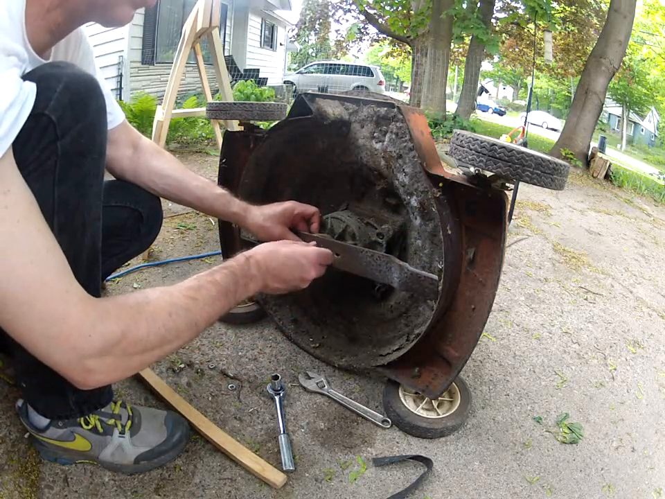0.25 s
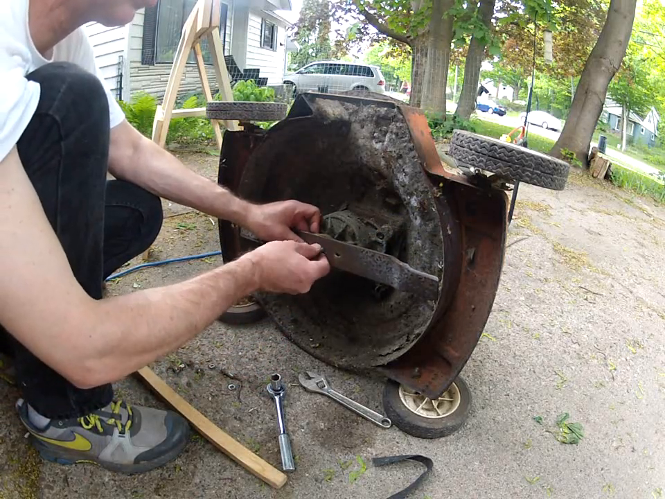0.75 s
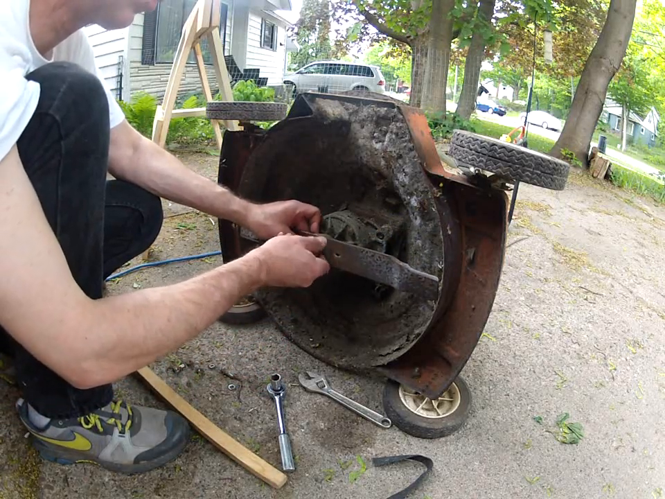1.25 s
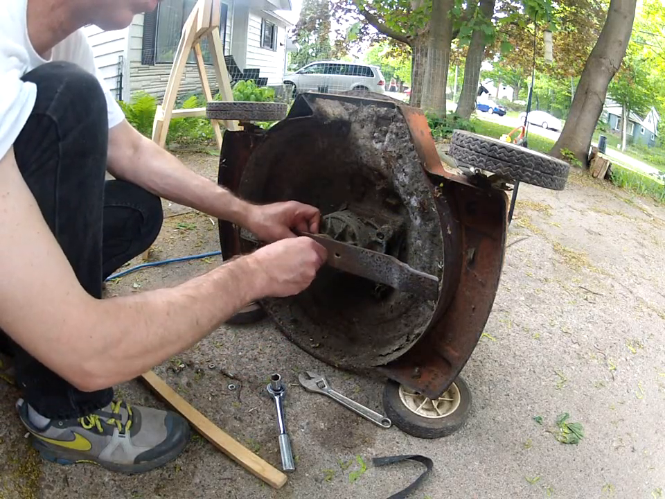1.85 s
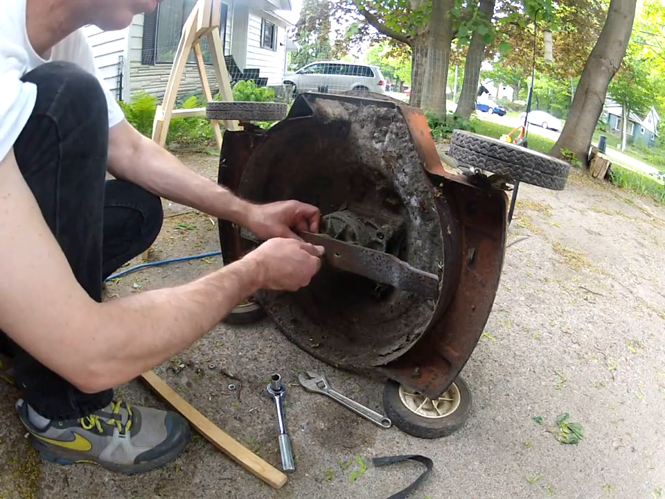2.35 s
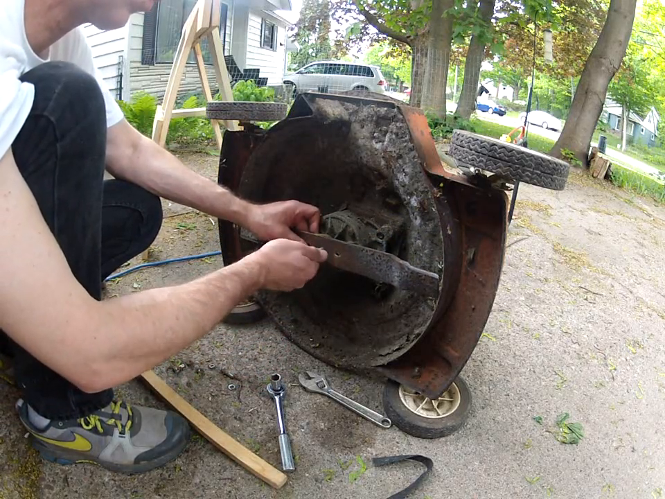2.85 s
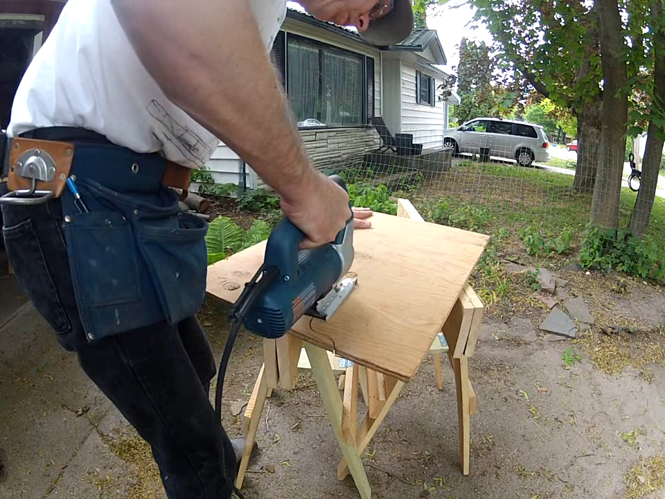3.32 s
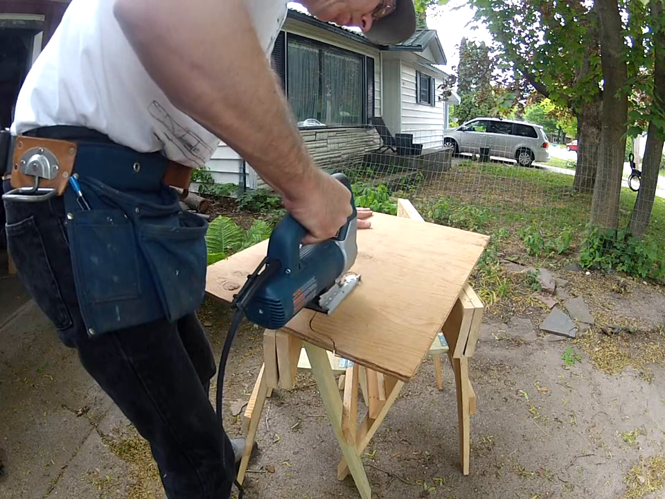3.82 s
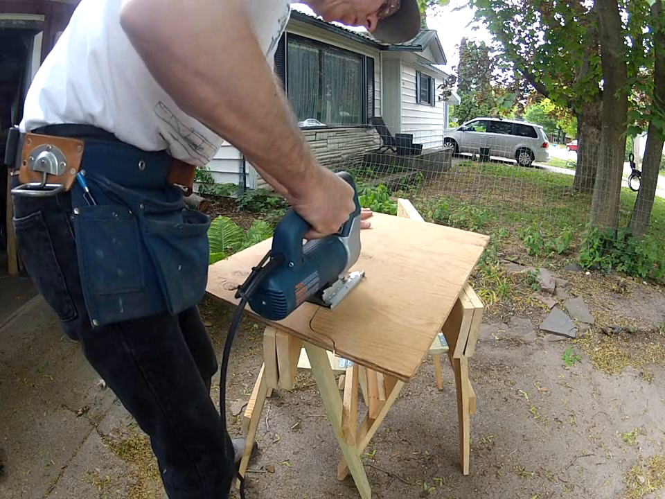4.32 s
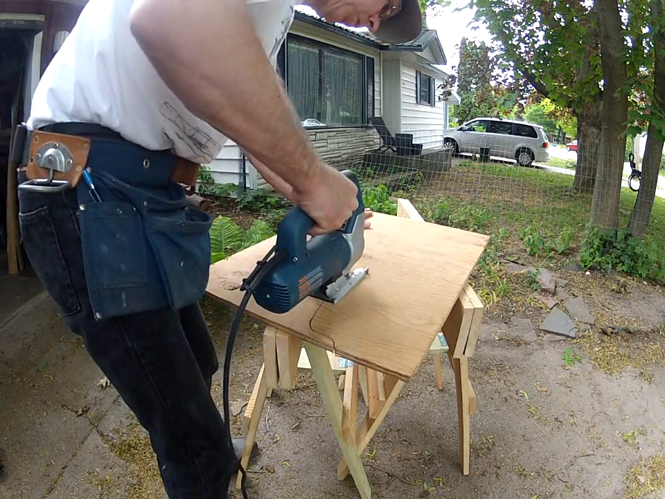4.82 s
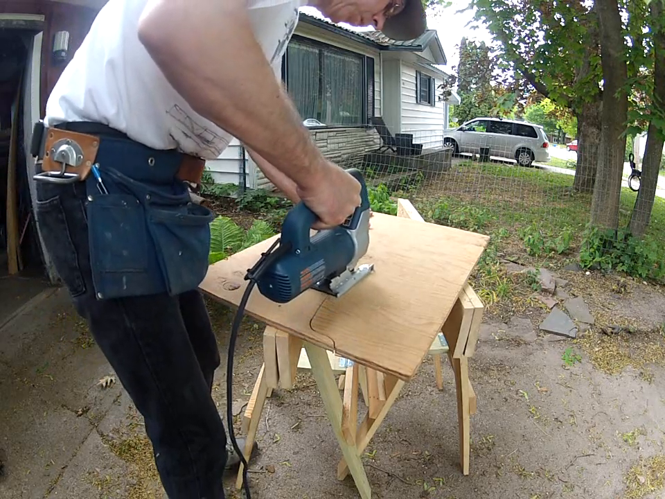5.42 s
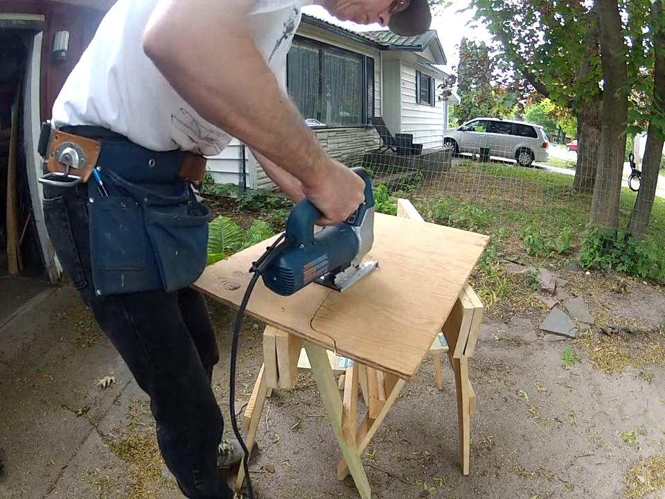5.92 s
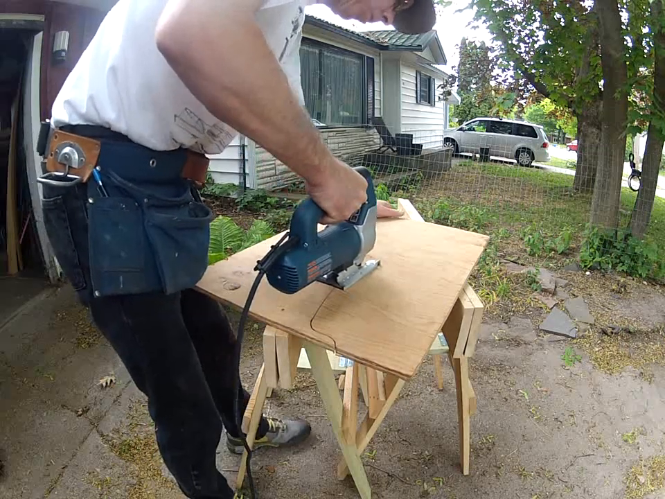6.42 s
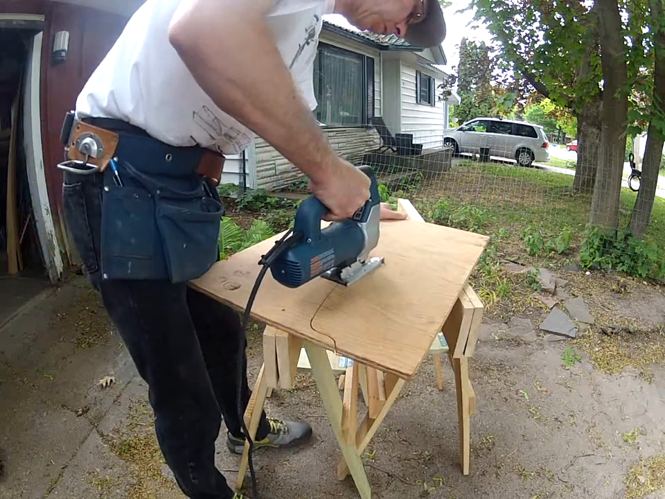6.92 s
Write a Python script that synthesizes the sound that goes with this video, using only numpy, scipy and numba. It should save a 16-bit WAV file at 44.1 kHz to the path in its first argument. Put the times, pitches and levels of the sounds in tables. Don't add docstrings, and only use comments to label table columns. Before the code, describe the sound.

Outdoors in a residential yard, a car pulls away, its engine pitch falling quickly and tyre drone fading to a faint hush while small birds whistle. After a tiny gap, a jigsaw bursts in close at full speed, a loud low buzz with rasping teeth. The plywood loosens, rings higher and slaps its support in rapid clatter, then the motor briefly races. Gritty, low-quality camera microphone with crunchy peaks and wind puffs.

```python
import sys
import numpy as np
from scipy import signal
from scipy.fft import rfft, irfft, next_fast_len
from scipy.io import wavfile
from scipy.ndimage import uniform_filter1d
from numba import njit

SR = 44100
rng = np.random.default_rng(int(sys.argv[2]) if len(sys.argv) > 2 else 0)


def natural_amplitude(level_db):
    exponent = np.asarray(level_db, float) / 20
    return 10 ** exponent


def generate_wav(signal):
    frames = np.transpose(np.atleast_2d(signal))
    scaled = np.clip(frames, -1, 1) * 32767
    pcm = np.round(scaled).astype(np.int16)
    wavfile.write(sys.argv[1], SR, pcm)


N = 315756
T = np.arange(N) / SR
STREET_ENDS_S, SAW_STARTS_S = 3.1305, 3.1498


def curves(table):
    s, *columns = np.transpose(table)
    return [np.interp(T, s, c) for c in columns]


def stages(table, glide_s):
    s, *columns = np.transpose(table)
    row = np.clip(np.searchsorted(s, T) - 1, 0, None)
    return [uniform_filter1d(c[row], int(glide_s * SR)) for c in columns]


def steady(x, window_s=0.064):
    window = int(window_s * SR)
    power = uniform_filter1d(uniform_filter1d(x ** 2, window), window)
    return x / np.sqrt(power + 1e-12)


def colour(x, spectrum):
    hz, db = np.transpose(spectrum)
    size = next_fast_len(N)
    f = np.arange(size // 2 + 1) * SR / size + 1
    gain = natural_amplitude(np.interp(np.log(f), np.log(hz), db))
    return steady(irfft(rfft(x, size) * gain, size)[:N], 0.33)


def walk(rate):
    k = int(SR / rate)
    steps = np.repeat(rng.standard_normal(N // k + 1), k)
    return 1.17 * uniform_filter1d(uniform_filter1d(steps, k), k)[:N]


@njit
def svf(x, hz, width):
    y, b, l = np.empty(len(x)), 0., 0.
    for i in range(len(x)):
        g, k = np.tan(np.pi * hz[i] / SR), width[i] / hz[i]
        v = (b + g * (x[i] - l)) / (1 + g * (g + k))
        b, l, y[i] = 2 * v - b, l + 2 * g * v, k * v
    return y


def ring(x, modes, scale_hz=0.93, sign=-1):
    ones = np.ones(N)
    return sum(sign ** k * natural_amplitude(db) * svf(x, f * scale_hz * ones, w * ones)
               for k, (f, w, db) in enumerate(modes))


# start in seconds, push into the sheet in dB, feed into the wood in dB,
# roughness from 0 to 1, level of every second stroke in dB.
CUT_STAGES = [(3.15, -15.5, -16, 0.24, -1.5), (3.5, -15, -18, 0.31, 0.5), (4.25, -14.5, -18, 0.42, -1),
              (4.76, -26, -15.5, 0.31, 0), (5.0, -18.5, -16, 0.37, -1), (5.21, -22, -16, 0.33, -4),
              (5.34, -13.5, -16, 0.48, -1), (5.53, -13, -21.5, 0.54, -18), (6.12, -24, -21.5, 0.62, 1.5),
              (6.27, -22.5, -18.5, 0.48, 1.5), (6.42, -25.5, -18.5, 0.16, 1), (6.7, -28.5, -16, 0.24, 2),
              (6.85, -16.5, -17, 0.42, -9), (6.97, -17, -18.5, 0.42, 0)]
FREED_S, FREEING_S = 4.76, 0.046
LOADED_HZ = 40.6


def jigsaw():
    rate, count = crank()
    push_db, feed_db, rough, weak_db = stages(CUT_STAGES, 0.06)
    rough = np.clip(rough, 0, 1)
    eased_db = push_db - CUT_STAGES[0][1]
    freed = np.clip((T - FREED_S) / FREEING_S + .5, 0, 1)
    knock = knocks(count, rough, weak_db)
    teeth = toothmarks(count)
    noise = rng.standard_normal((4, N))
    gate = 1 + 0.084 * np.cos(2 * np.pi * (count % 1 - 0.05))
    bite = knock + 4.7 * teeth + 3.0 * rough * gate * noise[3]

    sheet = natural_amplitude(push_db) * sheet_boom(knock + 4.0 * rough * noise[1], eased_db, freed)
    sheet = sheet - sheet_middle(knock + 3.05 * teeth + 5.0 * rough * gate * noise[2], eased_db, freed)
    sheet = sheet + sheet_upper(bite, rate, eased_db, freed)
    cutting = rasp(knock, teeth, rough, gate, noise[0]) + blade_ring(bite) + sheet_buzz(teeth, freed)
    machine = gear_whine(noise[0], rate, freed) + gear_mesh(rate, count) + squeal(noise[1])
    return sheet - housing_shake(count, eased_db) + natural_amplitude(feed_db) * cutting + machine


# time in seconds, blade speed in strokes per second.
STROKE_RATE = [(3.15, 39.8), (3.39, 40.1), (3.6, 40.6), (4.08, 40.6), (4.37, 40.4), (4.65, 40.7),
               (4.91, 40.9), (5.25, 41.0), (5.58, 40.35), (6.17, 40.2), (6.38, 41.2), (6.51, 42.6),
               (6.64, 43.3), (6.8, 42.9), (6.87, 42.2), (7.05, 41.1), (7.16, 40.3)]


def crank():
    rate, = curves(STROKE_RATE)
    count = .76 + np.cumsum(rate * (T >= SAW_STARTS_S)) / SR
    return rate, count


def knocks(count, rough, weak_db):
    stroke, phase = count.astype(int), count % 1
    uneven_db = 7.3 * rough * rng.standard_normal(stroke[-1] + 1)[stroke]
    knock = natural_amplitude(weak_db * (stroke % 2) + uneven_db) * np.exp(-phase / 0.0083)
    return knock / np.std(knock)


def toothmarks(count, size=1100, lasts=14):
    marks = rng.standard_normal((int(count[-1] / lasts) + 2, size))
    place, step = (count % 1 * size).astype(int), (count / lasts).astype(int)
    turn = count / lasts % 1 * np.pi / 2
    return np.cos(turn) * marks[step, place] + np.sin(turn) * marks[step + 1, place]


def sheet_boom(drive, eased_db, freed):
    hz = 168.7 + 20.5 * np.clip(T - FREED_S, 0, None)
    width = np.clip(20.7 + 20 * freed - 1.0 * eased_db, 10, None)
    return steady(svf(svf(drive, hz, width), hz, 0.39 * hz))


# multiple of the moving base pitch, width in Hz, level in dB.
MIDDLE_MODES = [(.85, 25, -27), (0.967, 18.4, 9.5), (1.084, 26, 2), (1.21, 28, 1.5), (1.45, 20, 0.5)]


def sheet_middle(drive, eased_db, freed):
    hz = 335.4 + (410 - 335.4) * freed
    level_db = -12 - 9 * freed + 0.2 * eased_db
    return natural_amplitude(level_db) * steady(svf(ring(drive, MIDDLE_MODES, hz, 1), hz, 0.25 * hz))


# centre in Hz, width in Hz, level in dB.
UPPER_MODES = [(619, 51, 3), (601, 31, 5), (714, 88, -3.5), (780, 91, -7), (922, 94, -11.5)]
# start in seconds, multiple of the stroke rate, level in dB.
OFFCUT = [
    (3.15, 20, 3),
    (3.7, 18, -12),
    (4.7, 17, 8),
    (5.0, 17, 13),
    (5.38, 16, 12),
    (5.75, 15.5, 6),
    (6.27, 21, 11),
    (6.55, 17, 8),
    (6.82, 15, 5),
]


def sheet_upper(bite, rate, eased_db, freed):
    level_db = -24 + 5.46 * freed + .25 * eased_db
    level_db = level_db - np.clip(rate - LOADED_HZ - .5, 0, None)
    order, offcut_db = stages(OFFCUT, .025)
    modes = ring(bite, UPPER_MODES, .93 + (0.94 - .93) * freed)
    offcut = natural_amplitude(offcut_db) * ring(bite, [(0.98, 12.5, 0)], order * rate)
    return natural_amplitude(level_db) * steady(ring(modes + offcut, [(620, 710, 0)]))


# centre in Hz, width in Hz, level in dB.
SAW_BODY = [(2160, 840, -13), (2500, 120, -0.5), (3300, 240, -6.5), (3840, 220, -12), (5200, 220, -4)]
# frequency in Hz, level in dB per Hz.
RASP_SHAPE = [(620, 0.5), (1050, -3.5), (1390, 0.5), (1780, -6), (2070, -2), (2340, -5), (2570, 0.5),
              (3140, -1.5), (4230, -10.5), (4860, -8), (6000, -17), (7800, -55), (13200, -120)]


def rasp(knock, teeth, rough, gate, fresh_wood):
    same = np.clip(.65 + .7 * (.5 - rough), 0, .88)
    grit = natural_amplitude(1.5 * walk(150))
    chips = gate * grit * (same * teeth + np.sqrt(1 - same ** 2) * fresh_wood)
    sound = colour(chips + 0.66 * ring(chips + 0.73 * knock, SAW_BODY), RASP_SHAPE)
    bright = natural_amplitude(-3 + 1.67 * (T - SAW_STARTS_S)) - 1
    return sound + bright * ring(sound, [(5100, 3400, 0)], 0.91)


# start in seconds, centre in Hz, level in dB.
BLADE_RING = [
    (3.15, 1272, -6.5),
    (3.42, 1240, -13),
    (4.42, 1443, -15),
    (5.0, 1455, -19),
    (5.55, 1454, -9.5),
    (6.1, 1530, -16),
    (6.45, 1135, -14.5),
    (6.78, 1500, -10),
    (6.95, 1220, -12),
]


def blade_ring(bite):
    hz, level_db = stages(BLADE_RING, .025)
    narrow = ring(bite, [(0.93, 90, 0)], hz)
    return natural_amplitude(level_db) * steady(ring(narrow, [(0.93, 390, 0)], hz))


# centre in Hz, width in Hz, level in dB.
BUZZ_MODES = [(430, 98, -1.5), (714, 425, -1), (876, 173, -2.5)]


def sheet_buzz(teeth, freed):
    return natural_amplitude(-14 + 4.5 * freed) * steady(ring(teeth, BUZZ_MODES), 0.5)


# multiple of the stroke rate, level in dB.
WHINE_ORDERS = [(108.5, -5), (111.2, 0), (114, -6), (116.5, -3)]


def gear_whine(noise, rate, freed):
    level_db = -50 + 9 * freed + 2.0 * (rate - LOADED_HZ)
    bands = [(order, 70, db) for order, db in WHINE_ORDERS]
    flutter = natural_amplitude(4 * walk(18) - 2.5)
    return natural_amplitude(level_db) * flutter * steady(ring(noise, bands, rate))


def gear_mesh(rate, count):
    racing = np.clip(2 * (rate - 42.0), 0, 1)
    return racing * natural_amplitude(-27 + 3.6 * walk(19)) * np.sin(2 * np.pi * 110.6 * count)


def squeal(noise):
    swell = np.exp(-((T - 6.48) / .11) ** 4)
    return natural_amplitude(-37) * swell * steady(ring(noise, [(4965, 45, 0)], 1), .2)


# multiple of the stroke rate, level in dB.
SHAKE_ORDERS = [(2, -42), (2.5, -44), (3, -28)]


def housing_shake(count, eased_db):
    shake = sum(natural_amplitude(db + 2.0 * walk(28)) * np.sin(2 * np.pi * k * count) for k, db in SHAKE_ORDERS)
    return natural_amplitude(-4.5 + .8 * eased_db) * shake


# time in seconds, peak level in dB.
SLAP_HITS = [(4.469, -10), (4.568, -26), (4.717, -5), (5.008, -10), (5.032, -1), (5.178, -9), (5.349, -5),
             (5.402, 2.5), (5.448, 0.5), (5.496, 3.5), (5.547, -3), (5.597, 7), (5.646, 0), (5.696, 3.5),
             (5.746, 4), (5.794, -3), (5.846, -10), (5.894, -2), (5.944, -0.5), (5.996, 6), (6.043, -6),
             (6.093, 7.5), (6.17, -16), (6.292, -3), (6.861, 0.5), (6.929, 1.5), (7.028, -2), (7.075, -5),
             (7.125, 2.5)]
# centre in Hz, width in Hz, level in dB.
SLAP_MODES = [(90, 190, -12.5), (173, 500, -5.5), (344, 53, 1), (671, 49, -2)]


def slaps():
    push, crack = np.zeros((2, N))
    s, peak_db = np.transpose(SLAP_HITS)
    at = (s * SR).astype(int)
    push[at], crack[at] = natural_amplitude(peak_db), natural_amplitude(-25)
    push = push + natural_amplitude(1) * np.roll(push, int(0.00621 * SR))
    thud = ring(np.convolve(push, np.hanning(70))[:N], SLAP_MODES)
    decay = signal.lfilter([1], [1, -np.exp(-1 / (0.0089 * SR))], crack)
    rattle = decay * colour(rng.standard_normal(N), RASP_SHAPE)
    return natural_amplitude(3.5) * thud + natural_amplitude(8.0) * rattle


def slap_dip():
    s, peak_db = np.transpose(SLAP_HITS)
    dip_after_s, dip_s = 0.0061, 0.021
    hits = np.zeros(N)
    hits[((s + dip_after_s) * SR).astype(int)] = natural_amplitude(peak_db)
    return natural_amplitude(-2 * signal.fftconvolve(hits, np.hanning(int(4 * dip_s * SR)))[:N])


# time in seconds, engine beat in Hz, level in dB.
ENGINE = [
    (0, 81, -31),
    (.15, 72.6, -27),
    (.24, 65.8, -27),
    (.33, 57.8, -29),
    (.42, 52, -38),
    (.7, 47, -38),
    (1.1, 44, -43),
    (1.6, 42, -58),
    (3.2, 42, -70),
]
# multiple of the beat, level in dB.
ENGINE_ORDERS = [(1, -5), (2, 1), (3, -1), (5, -10)]
# time in seconds, level in dB.
RECEDING = [
    (0, -4.5),
    (.24, -1),
    (.46, -8),
    (.62, -13.5),
    (.88, -19.5),
    (1.6, -24),
    (2.1, -26.5),
    (2.7, -28.5),
    (3.13, -31.5),
]
# frequency in Hz, level in dB per Hz.
DRONE = [(120, -26), (200, -8.5), (323, -19), (356, -9.5), (432, -9), (520, 0), (617, 4), (809, -20.5),
         (1100, -40), (1430, -58), (2420, -120)]
RUMBLE = [(12, -41), (20, -23), (107, -3), (145, -8.5), (177, -11.5), (323, -19.5), (357, -17),
          (400, -20.5), (520, -22), (880, -120)]
HISS = [(470, -29), (800, -5), (947, -10.5), (1220, -10), (1540, -15.5), (2630, -14), (2980, -12),
        (4250, -24.5), (4980, -21), (6000, -32.5), (7800, -63), (13200, -120)]
# level at the closest in dB, dB per dB of distance.
ROAD_LAWS = [(-20.5, 1.04), (-31.5, 0.52), (-36.5, 0.61)]


def car():
    beat_hz, engine_db = curves(ENGINE)
    turns = np.cumsum(beat_hz * (1 + .004 * walk(20))) / SR
    engine = sum(natural_amplitude(db + 1.5 * walk(10)) * np.sin(2 * np.pi * k * turns) for k, db in ENGINE_ORDERS)
    far_thump_db = 5 * np.exp(-((T - 2.85) / 0.054) ** 2)
    far_db = curves(RECEDING)[0] + far_thump_db
    road = [natural_amplitude(db + follow * far_db + 1.9 * walk(7.6)) * colour(rng.standard_normal(N), shape)
            for (db, follow), shape in zip(ROAD_LAWS, (DRONE, RUMBLE, HISS))]
    return natural_amplitude(engine_db) * engine + sum(road)


# start in seconds, length in seconds, from Hz, to Hz, level in dB, breathiness from 0 to 1.
CHIRPS = [(1.62, .05, 4900, 4550, -57, .5), (1.91, 0.051, 5950, 5600, -56, 0.2),
          (2.052, 0.12, 4800, 5650, -56, .95), (2.347, 0.025, 5300, 4650, -56, .2),
          (2.465, 0.03, 5950, 5450, -64, .1), (2.595, 0.14, 4400, 4970, -56, 0.9),
          (2.635, .04, 5950, 5600, -59, .1), (2.785, 0.047, 5900, 5480, -52, 0.2),
          (2.83, 0.067, 5550, 5520, -66, .1), (2.8, 0.13, 3300, 3890, -53, 0.8),
          (2.97, .09, 4270, 4200, -65, .1), (2.99, 0.064, 4520, 4500, -70, .1)]


def birds():
    out = np.zeros(N)
    for s, length, from_hz, to_hz, db, breath in CHIRPS:
        n = int(length * SR)
        u = np.arange(n) / n
        hz = to_hz + (from_hz - to_hz) * (1 - u) ** 3
        hoarse = 1 - breath + breath * walk(900)[:n]
        swell = np.sin(np.pi * u ** 0.65)
        out[int(s * SR):][:n] += natural_amplitude(db) * hoarse * swell * np.sin(2 * np.pi * np.cumsum(hz) / SR)
    echoes = ((.03, -7), (.065, -8), (.12, -14))
    return out + sum(natural_amplitude(db) * np.roll(out, int(lag_s * SR)) for lag_s, db in echoes)


# time in seconds, level in dB.
PUFFS = [(3.16, -26), (3.69, -47), (4.01, -43), (4.38, -46), (4.61, -51.5), (5.501, -32), (5.761, -38),
         (6.0, -44), (6.1, -45), (6.49, -45), (6.8, -45)]


def wind():
    puffs = natural_amplitude(-80) + sum(natural_amplitude(db) * np.exp(-np.abs(T - s) / 0.022) for s, db in PUFFS)
    shape = [(10, -10), (25, 6), (60, -3), (110, -8), (200, -34), (400, -90)]  # Hz, dB
    return puffs * colour(rng.standard_normal(N), shape)


def scene():
    street = (car() + birds()) * np.clip((STREET_ENDS_S - T) / .002 + 1, 0, 1)
    small_sheet = signal.butter(3, 100, "high", fs=SR, output="sos")
    saw = signal.sosfilt(small_sheet, slap_dip() * jigsaw() + slaps())
    return (street + (saw + wind()) * (T >= SAW_STARTS_S))[None]


def low_pass(x):
    return signal.sosfilt(signal.butter(12, 16530, fs=SR, output="sos"), x)


def record(dry):
    slow = signal.resample_poly(dry, 40, 147, axis=1)
    slow = slow / (1 + np.abs(slow / .99) ** 12) ** (1 / 12)
    held = signal.resample_poly(np.repeat(slow, 4, axis=1), 147, 160, axis=1)[:, :N]
    top = signal.ellip(8, .1, 45, 15250, fs=SR, output="sos")
    mix = np.clip(signal.sosfilt(top, held), -1, 1)
    return low_pass(mix)


dry = scene()
out = record(dry)
generate_wav(out)
```